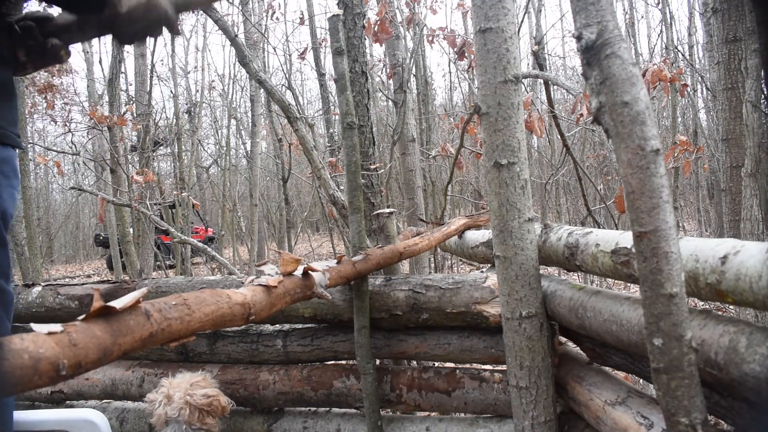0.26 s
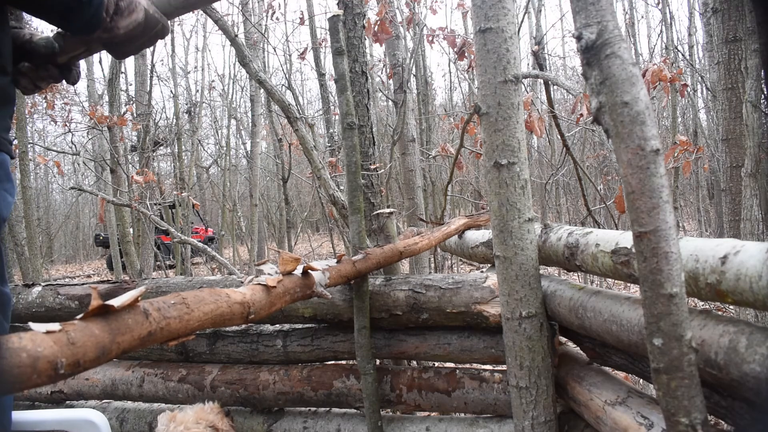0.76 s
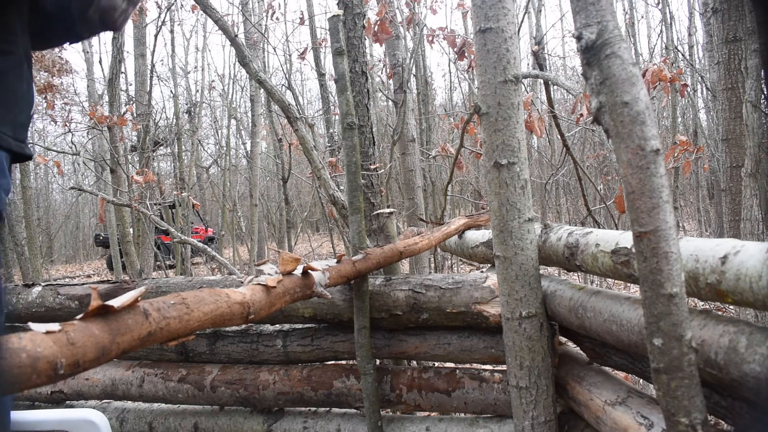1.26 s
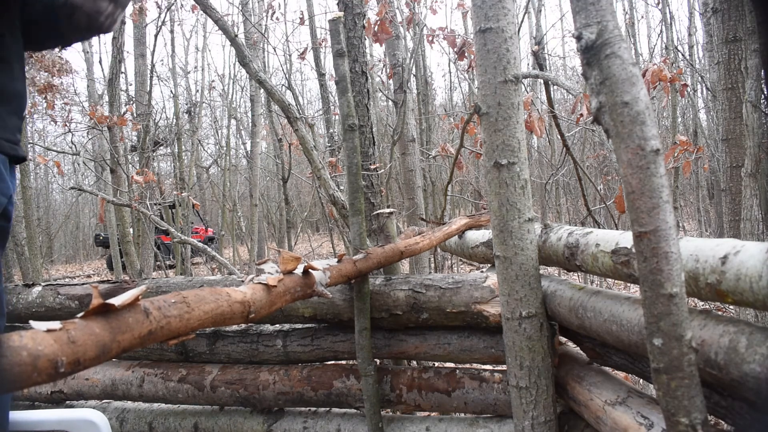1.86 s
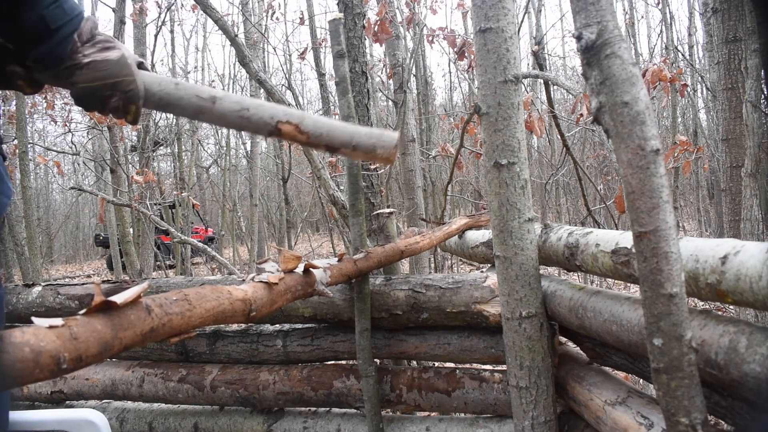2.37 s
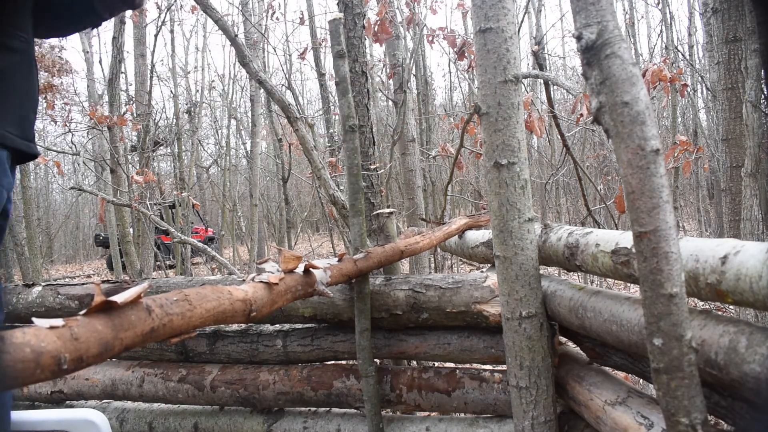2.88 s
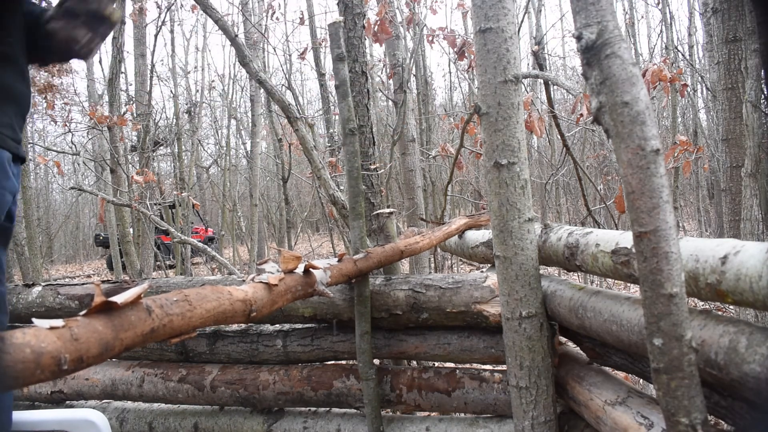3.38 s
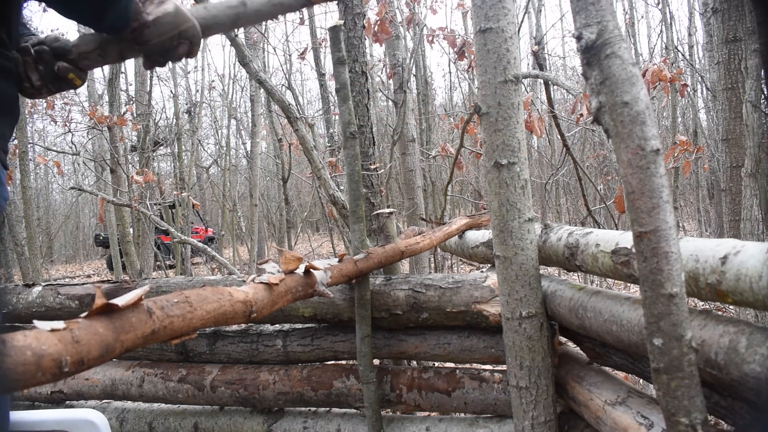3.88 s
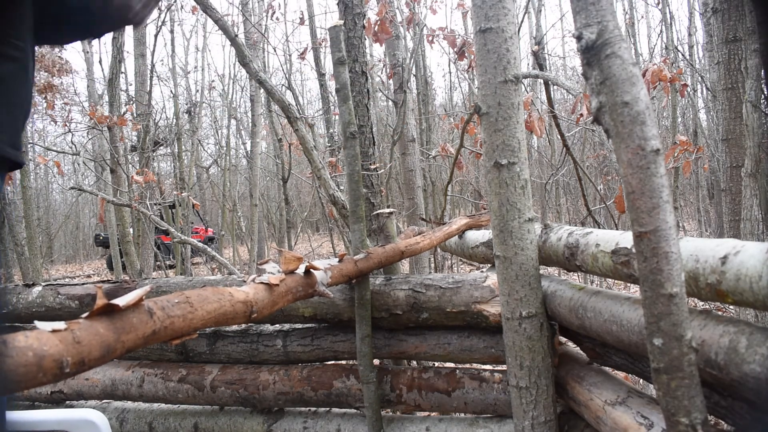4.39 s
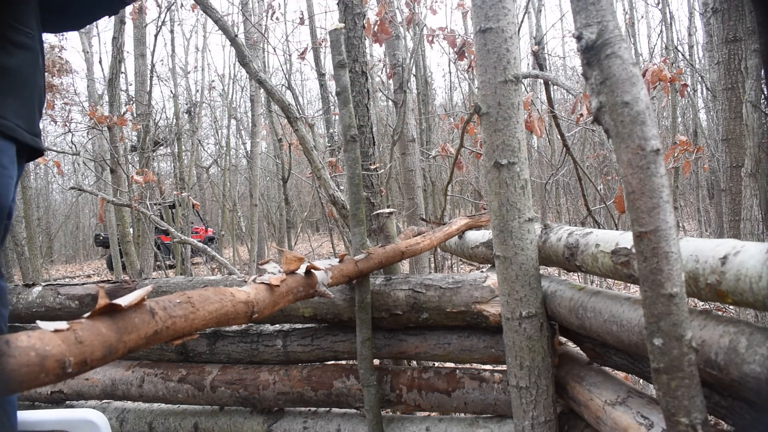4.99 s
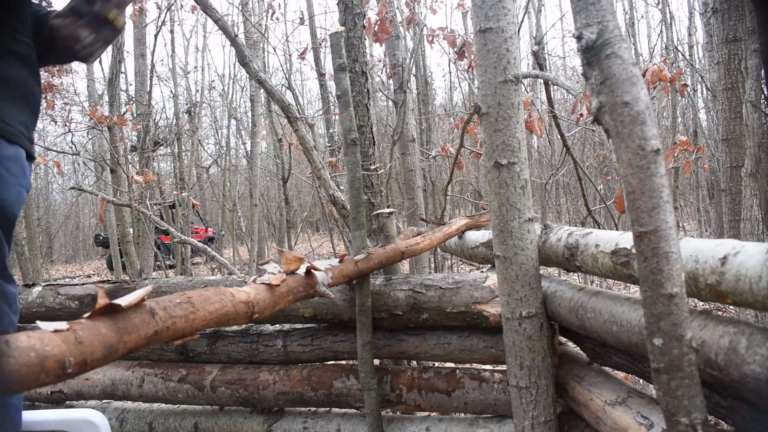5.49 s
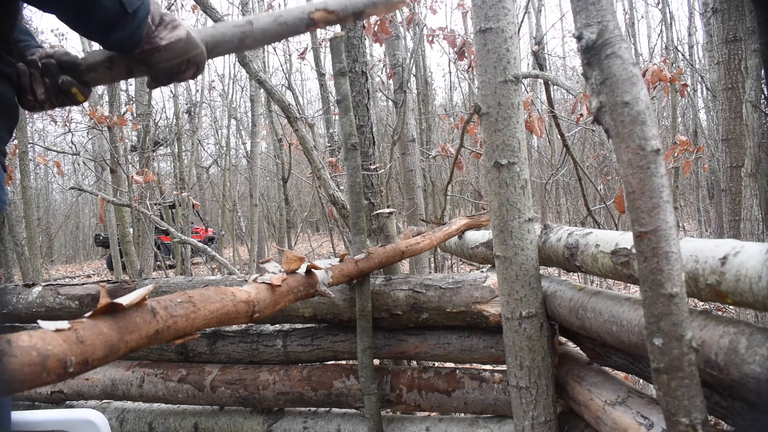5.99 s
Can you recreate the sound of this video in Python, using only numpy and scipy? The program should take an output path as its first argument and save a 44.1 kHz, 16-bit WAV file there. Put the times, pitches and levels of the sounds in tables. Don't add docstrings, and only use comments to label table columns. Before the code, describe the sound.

Outdoors in a bare wood, close to a small microphone, with quiet still air and a far low rumble. Cloth and dragged bark rustle at the start, then at 0.3 s a pole hits logs with a softer, heavy thud. Twigs snap around 0.45-0.55 s and in a thick cluster at 1.1-1.3 s, with faint high tinkles from a dog's metal tag until about 1.6 s. Full blows land at 1.4, 2.2 (hard, dry, with a quick double hit), 3.1, 3.8, 4.5 (hardest), 5.2 and 5.9 s. Each is a woody knock and bark crack over a deep, briefly ringing trunk; the input clips roughly and nearby trees scatter a short tail. Between them sleeves rustle, grit ticks, and logs creak faintly near 2.7, 4.0 and 4.8 s. Crisp leaf footfalls come at 4.9 and 5.6 s. The last blow's low ring fades.

```python
import sys
import numpy as np
from scipy import signal
from scipy.fft import rfft, irfft
from scipy.io import wavfile
from scipy.ndimage import uniform_filter1d

SR = 44100
rng = np.random.default_rng(int(sys.argv[2]) if len(sys.argv) > 2 else 0)


def convert_level_to_amplitude(level_db):
    exponent = np.asarray(level_db, float) / 20
    return 10 ** exponent


def unload_audio(sound):
    columns = np.transpose(np.atleast_2d(sound))
    steps = np.round(np.clip(columns, -1, 1) * 32767)
    wavfile.write(sys.argv[1], SR, steps.astype(np.int16))


N = 275625

# trunk ring in dB, thud in dB, crack in dB.
BLOWS = [
    (0.309, -14, -1, -0.5, -11),
    (1.407, -2, -6.5, -2.5, -8.5),
    (2.204, 0, -10.5, -17.5, -14.5),
    (3.057, -1, -7.5, -6.5, -13),
    (3.777, -2, -4.5, -7, -7),
    (4.5023, 0.5, -7.5, -12.5, -12.5),
    (5.216, -2, -5, -3.5, -8),
    (5.9294, -1.5, -4.5, -4, -4),
]


def level(x, db):
    return x * convert_level_to_amplitude(db) / np.sqrt(np.mean(x ** 2))


def colour(x, spectrum):
    hz, db = np.transpose(spectrum)
    f = np.maximum(np.arange(len(x) // 2 + 1) * SR / len(x), 1)
    return irfft(rfft(x) * convert_level_to_amplitude(np.interp(np.log(f), np.log(hz), db)), len(x))


def band(x, lo_hz, hi_hz, order=2):
    edges = [lo_hz, min(hi_hz, .45 * SR)]
    return signal.sosfilt(signal.butter(order, edges, "band", fs=SR, output="sos"), x)


def fade(t, t60):
    return np.exp(-np.log(1000) * t / np.maximum(t60, 1e-3))


def walk(rate):
    k = int(SR / rate)
    return uniform_filter1d(np.repeat(rng.standard_normal(N // k + 1), k), k)[:N]


def add(out, s, x):
    i = int(round(s * SR))
    out[i:i + len(x)] += x[:len(out) - i]


def outdoors():
    # frequency in Hz, density in dB per Hz.
    air_colour = [(100, -29.5), (170, -8), (371, -10), (423, -9), (996, -16), (1250, -22), (1760, -25),
                  (1940, -22), (4740, -29), (16000, -32)]
    # frequency in Hz, density in dB per Hz.
    rumble_colour = [(12, -50), (20, -20), (27, -15), (42, 0), (59, 0), (70, -1), (81, -12), (102, -19),
                     (119, -4), (140, -3), (153, -8), (162, -22), (200, -20), (260, -50), (440, -120)]
    air = level(colour(rng.standard_normal(N), air_colour), -61) * convert_level_to_amplitude(1.4 * walk(4.7))
    rumble = level(colour(rng.standard_normal(N), rumble_colour), -52.5) * convert_level_to_amplitude(0.71 * walk(2.3))
    return air + rumble


def grains(rate):
    hits = rng.random(N) < rate / SR
    boost_db = 4.0 * np.minimum(rng.exponential(size=N), 3)
    return level(hits * rng.standard_normal(N) * convert_level_to_amplitude(boost_db), 0)


def swell(s, rise_s, hold_s, fall_s, db):
    t = np.arange(N) / SR
    rise_db = 10 * np.maximum(s - t, 0) / max(rise_s, 1e-3)
    fall_db = 10 * np.maximum(t - s - hold_s, 0) / max(fall_s, 1e-3)
    return convert_level_to_amplitude(2 * (db - rise_db - fall_db))


def leaf_litter():
    # frequency in Hz, density in dB per Hz.
    rustle_colour = [(150, -38), (250, -6), (566, -0.5), (629, 1.5), (788, -3.5), (1330, -4.5),
                     (1880, -5.5), (2620, -4), (3840, -6), (4650, -5), (5630, -11.5), (7570, -12.5),
                     (10400, -18), (15200, -29.5), (16000, -33.5)]
    bits = sum(band(grains(250), hz / 1.12, hz * 1.12) for hz in 600 * 1.25 ** np.arange(15))
    crushed = level(bits, -2) + level(grains(900), -10) + rng.standard_normal(N)
    return colour(crushed, rustle_colour) * convert_level_to_amplitude(1.5 * walk(90))


def rustle():
    # peak in seconds, rise in seconds per 10 dB,
    # fall in seconds per 10 dB, level in dB.
    sleeve_rows = [(.02, 11, 0.08, -49.5), (.61, .15, 1.2, -65.5), (1.489, 0.08, .04, -41),
                   (1.64, 0.41, 0.5, -52), (1.724, -0.06, 1.05, -56.5), (1.9, 0.05, 0.23, -47.5),
                   (2.166, 0.04, 0.05, -42), (2.414, 0.11, 0.13, -47.5), (2.48, 0.16, 0.13, -53),
                   (2.675, 0.01, 0.18, -48), (2.871, 0.18, 0.09, -49.5), (2.999, 0.26, 0.08, -46.5),
                   (3.285, -0.1, -0.6, -62.5), (3.345, 0.0858, 0.0658, -38.5), (3.51, .06, -0.06, -46.5),
                   (3.699, 0.15, 0.1428, -37), (3.941, -0.1, 0.24, -46.5), (4.1, -0.37, 0.03, -45),
                   (4.43, 0.1, 0.14, -53.5), (5.331, 0.2, 0.15, -49), (5.52, -0.06, 0.77, -54),
                   (6.039, -0.52, 0.03, -50), (6.199, -0.4, -0.3, -54)]
    # peak in seconds, rise in seconds per 10 dB,
    # fall in seconds per 10 dB, level in dB.
    drag_rows = [
        (0.082, 0.3, .05, -47.5),
        (4.085, 0.07, -0.1, -46),
        (4.79, 0.17, 0.2, -57),
    ]
    # start in seconds, hold in seconds,
    # fall in seconds per 10 dB, level in dB.
    step_rows = [
        (1.11, 0.068, 0.02, -50),
        (1.341, 0.21, -0.04, -53),
        (4.922, .005, -0.16, -39),
        (4.937, 0.059, 0.01, -43.5),
        (5.023, .05, 0, -44.5),
        (5.594, 0.11, 0.02, -38.5),
        (5.727, 0.033, 0.03, -45.5),
        (5.799, 0.013, 0.08, -48.5),
    ]
    sleeves = sum(swell(s, rise, 0, fall, db) for s, rise, fall, db in sleeve_rows)
    drag = sum(swell(s, rise, 0, fall, db) for s, rise, fall, db in drag_rows)
    steps = sum(swell(s, 0.0037, hold, fall, db) for s, hold, fall, db in step_rows)
    settling = sum(swell(s, 0, 0, 0.11, db - 46) for s, db, *_ in BLOWS)
    stirring = convert_level_to_amplitude(2 * -71)
    # power, then low and top bands in dB relative to the middle.
    movers = [(sleeves, -8.5, -8.5), (steps, -10, -5.5), (settling, 8, -14),
              (drag, -4, -28), (stirring, 5.5, -2.5)]
    low_gain = np.sqrt(sum(power * convert_level_to_amplitude(2 * low_db) for power, low_db, _ in movers))
    mid_gain = np.sqrt(sum(power for power, _, _ in movers))
    top_gain = np.sqrt(sum(power * convert_level_to_amplitude(2 * top_db) for power, _, top_db in movers))

    litter = leaf_litter()
    low = level(band(litter, 250, 1200, order=3), 0) * convert_level_to_amplitude(1.5 * walk(40))
    mid = level(band(litter, 1200, 5400, order=4), 0) * convert_level_to_amplitude(1.2 * walk(60))
    top = level(band(litter, 6600, 16000, order=4), 0) * convert_level_to_amplitude(1.2 * walk(60))
    crisp = np.sqrt(steps) * level(band(litter[::-1], 3900, 5400, order=3), -5.5)
    bark = np.sqrt(drag) * level(band(litter[::-1], 800, 2300), 3.5)
    return convert_level_to_amplitude(-2.5) * (crisp + low_gain * low + mid_gain * mid + top_gain * top + bark)


def snaps():
    # start in seconds, peak in dB, centre in Hz, edge in dB relative to the body.
    twig_rows = [(0.0287, -38, 2070, -17), (.2044, -57, 1330, -20), (.408, -38, 2330, -25),
                 (0.4452, -24, 1230, -15), (.5107, -40, 2550, -14), (0.5302, -18.5, 1930, -35),
                 (.546, -25.5, 1750, -34), (.555, -34, 2050, -18), (.5846, -39, 2110, -17),
                 (.845, -39, 1260, -2), (1.1007, -29, 1230, -3), (1.1104, -35.5, 2210, 4),
                 (1.1294, -40, 2090, -11), (1.2095, -25, 1570, -7), (1.2166, -18, 1460, -17),
                 (1.2306, -16, 1930, -12), (1.2455, -21.5, 1210, -8), (1.2666, -24, 2380, -15.5),
                 (1.383, -34, 1190, 5), (1.6192, -37, 2830, 10), (2.4124, -46.5, 1720, -15),
                 (2.809, -38.5, 2970, -3.5), (3.3019, -26.5, 3270, -20), (3.7224, -22, 1330, -2.5),
                 (5.315, -35.5, 2420, -19.5), (5.7166, -31.5, 1530, -6.5), (5.803, -31, 1360, -10),
                 (5.9927, -28.5, 1250, 3), (6.0574, -48, 1213, -12)]
    # start in seconds, peak in dB, centre in Hz.
    grit_rows = [(0.1393, -34.5, 5970), (0.1498, -32, 5800), (.165, -37.5, 6800), (0.19, -41, 6770),
                 (.232, -35.5, 6800), (1.156, -29.5, 5100), (1.175, -28.5, 6500), (1.29, -42, 3970),
                 (1.328, -46.5, 4750), (1.3442, -36, 4140), (1.3543, -45.5, 7670), (1.72, -30, 3620),
                 (2.089, -36.5, 4000), (2.161, -33.5, 4000), (2.8427, -31.5, 4100), (2.8692, -22.5, 3920),
                 (3.0116, -41.5, 4100), (4.2722, -41.5, 4500), (4.4182, -43.5, 3530), (4.921, -28.5, 4380),
                 (4.942, -26, 3530), (5.0694, -41.5, 7020), (5.1557, -46.5, 4660), (5.5972, -20.5, 4230),
                 (5.675, -23, 4530), (5.7814, -48.5, 4800), (5.8195, -27.5, 5050), (5.8472, -33.5, 4150)]
    twigs = [(*row, 0.025 * 2 ** ((row[1] + 40) / 30.5)) for row in twig_rows]
    grit = [(*row, -12.5, 0.025) for row in grit_rows]
    out, t = np.zeros(N), np.arange(SR // 10) / SR
    width = 1.4
    for s, db, hz, edge_db, t60 in twigs + grit:
        noise = rng.standard_normal((3, len(t)))
        body = level(band(noise[0], hz / width, hz * width), 0)
        crisp = level(band(noise[1], 3500, 4200), edge_db)
        bright = level(band(noise[2], 6300, 12500), edge_db - 7)
        snap = body * fade(t, t60) + (crisp + bright) * fade(t, 0.52 * t60)
        add(out, s, convert_level_to_amplitude(db - 8.5) * snap)
    return out


def contact(first_s, chatter_s, chatter):
    t = np.arange(SR // 40) / SR
    push = np.exp(-((t - 2 * first_s) / first_s) ** 2) / (first_s * SR)
    rough = rng.standard_normal(len(t)) * t / chatter_s * np.exp(-t / chatter_s)
    return push + chatter * rough


def ring(modes, push, spread, grip_t60, free_db, scatter_db=2.5, count=4):
    hz, db, t60 = np.repeat(modes, count, axis=0).T[:, :, None]
    chance = rng.standard_normal((2, len(hz), 1))
    t = np.arange(SR // 4) / SR
    tones = np.sin(2 * np.pi * hz * (1 + spread * chance[1]) * t)
    body = (convert_level_to_amplitude(db + scatter_db * chance[0]) * fade(t, t60) * tones).sum(0)
    gripped = body * (fade(t, grip_t60) + convert_level_to_amplitude(free_db))
    y = signal.fftconvolve(gripped, push)[:len(t)]
    return y / np.abs(y).max()


def sway(modes, rise_s):
    t = np.arange(int(1.2 * SR)) / SR
    hz, db, t60, lag_ms = np.transpose(modes)[:, :, None]
    tones = np.cos(2 * np.pi * hz * (t - lag_ms / 1000))
    return (convert_level_to_amplitude(db) * fade(t, t60) * tones).sum(0) * (1 - np.exp(-(t / rise_s) ** 2))


def trunk_ring():
    # frequency in Hz, level in dB, t60 in seconds, arrival lag in ms.
    trunks = [(58.5, -4.4, .5, .2), (70.4, -14, 1.1, 4.0), (84.4, -12, .45, .6), (91.8, 0, .37, .9),
              (48, -20, .3, 2.4)]
    # frequency in Hz, level in dB, t60 in seconds, arrival lag in ms.
    cross_logs = [(124, -9.5, .09, -1.24), (134.2, -3.5, 0.12, -3), (148, -22.5, 0.012, 5.5),
                  (184.6, -10, 0.089, -2.4), (247, -8.5, 0.083, -1.58), (32.4, -22, 0.8, 3.3)]
    return sway(trunks, 0.013) + sway(cross_logs, 0.00022)


def log_thud():
    # frequency in Hz, level in dB, t60 in seconds.
    log_modes = [(197, -3, 0.035), (247, 0, 0.084), (381.2, -2.5, 0.33), (438.4, 2, 0.15), (486, 1.5, .13),
                 (572, -6.5, 0.13)]
    return ring(log_modes, contact(0.00037, 0.0054, 0.29), 0.013, 0.1, -12.5)


def pole_knock():
    # frequency in Hz, level in dB, t60 in seconds.
    pole_modes = [(667, -1.5, 0.16), (787, -11.5, 0.13), (800, -3.5, 0.13), (895, -8, 0.048),
                  (961, 5, 0.035), (1080, 4, 0.039), (1250, 0, 0.005), (1446, -4, 0.086),
                  (1853, -15, 0.017)]
    return ring(pole_modes, contact(0.00023, 0.0022, 0.27), 0.019, 0.026, -17.5)


def burst(noise, rise_s, t60, tail_db, tail_t60):
    t = np.arange(len(noise)) / SR
    drop = fade(np.maximum(t - rise_s, 0), t60)
    trail = convert_level_to_amplitude(tail_db) * fade(t, tail_t60)
    return level(noise, 0) * np.minimum(t / rise_s, 1) ** 2 * (drop + trail)


def blows():
    # trunk ring in dB, thud in dB, crack in dB.
    bounces = [
        (0.318, -39.5, -43, -7, -28),
        (2.2149, -23, -24, 15, -20),
        (2.2237, -7.5, -16, -37, -13.5),
        (3.783, -16.5, -12, -0.5, -7.5),
        (5.935, -9, -29, -8.5, -46),
        (0.447, -47, -24, 4, 7),
        (0.532, -39.5, -24.5, -22, 5),
        (1.218, -42, -24.5, 4.5, 3),
        (1.232, -38, -17.5, -2, -10),
        (5.2257, -15.5, -23.5, 3.5, -15.5),
    ]
    # frequency in Hz, density in dB per Hz.
    crack_colour = [(1000, -24.5), (1500, -21), (2100, 3.5), (2500, -9), (3500, 3), (4400, -4.5),
                    (5300, -24), (6500, -27)]
    # frequency in Hz, density in dB per Hz.
    splinter_colour = [(3500, -18.5), (5000, -7.5), (7300, 2.5), (10000, -2), (13000, -16.5), (16000, -24)]
    graze_s = 0.0025
    sharp, low = np.zeros(N), np.zeros(N)
    trunk = trunk_ring()
    for s, knock_db, trunk_db, thud_db, crack_db in [*BLOWS, *bounces]:
        noise = rng.standard_normal((3, SR // 8))
        add(low, s, convert_level_to_amplitude(knock_db + trunk_db + 2) * trunk)
        add(sharp, s, convert_level_to_amplitude(knock_db + thud_db + 2) * log_thud())
        add(sharp, s, convert_level_to_amplitude(knock_db + 8) * pole_knock())
        graze = burst(band(noise[2], 500, 6800), graze_s, 0.016, -40, 0.03)
        add(sharp, s - graze_s, convert_level_to_amplitude(knock_db - 25) * graze)
        crack = burst(colour(noise[0], crack_colour), 0.0024, 0.013, -23, 0.02)
        add(sharp, s, convert_level_to_amplitude(knock_db + crack_db + 2) * crack)
        splinter = burst(colour(noise[1], splinter_colour), 0.0034, 0.0059, -21.5, 0.21)
        add(sharp, s, convert_level_to_amplitude(knock_db + max(trunk_db, -10.5) - 12) * splinter)
    return sharp, low


def wood(x):
    # band centre in Hz, level in dB, t60 in seconds.
    scatter = [(258.4, -58, 0.17), (463, -54, 0.19), (926, -55, 0.18), (1900, -37.5, 0.1),
               (4300, -30, 0.11), (8000, -30.5, 0.17), (13000, -25.5, 0.099)]
    t = np.arange(SR // 2) / SR
    tail = np.zeros(len(t))
    for hz, db, t60 in scatter:
        octave = level(band(rng.standard_normal(len(t)), hz / np.sqrt(2), hz * np.sqrt(2)), 0)
        tail += convert_level_to_amplitude(db) * fade(t, t60) * octave / np.sqrt(hz / 8000)
    return signal.fftconvolve(x, convert_level_to_amplitude(-16.5) * tail * np.minimum(t / 0.008, 1))[:N]


def tag():
    # start in seconds, then the level in dB of each of the four modes.
    taps = [
        (0.4094, -72, -73, -69, -80),
        (0.5447, -54, -73, -67, -75),
        (1.2494, -65, -64.5, -54, -75),
        (1.2744, -65, -55, -64, -77),
        (1.3544, -55.5, -59.5, -56, -67.5),
        (1.5544, -60, -69, -45.5, -73),
        (1.565, -54, -73, -65, -74),
    ]
    # frequency in Hz, t60 in seconds.
    disc_modes = [(7690, 0.089), (10780, .16), (11060, 0.06), (12930, 0.1)]
    out, t = np.zeros(N), np.arange(SR // 5) / SR
    for s, *dbs in taps:
        for db, (hz, t60) in zip(dbs, disc_modes):
            add(out, s, convert_level_to_amplitude(db + 0.5) * fade(t, t60) * np.sin(2 * np.pi * hz * t))
    return out


def creaks():
    # middle in seconds, length in seconds, frequency in Hz, level in dB.
    rubs = [
        (2.693, 0.034, 1110, -52.5),
        (3.982, 0.18, 1440, -57),
        (3.983, 0.08, 2440, -50),
        (4.087, 0.018, 865, -43.5),
        (4.79, .06, 1520, -59),
        (4.804, 0.054, 2420, -55.5),
        (4.843, 0.057, 890, -56),
    ]
    width = 1.06
    out, t = np.zeros(N), np.arange(N) / SR
    for s, length, hz, db in rubs:
        tone = level(band(rng.standard_normal(N), hz / width, hz * width), db)
        out += tone * np.exp(-(2 * (t - s) / length) ** 2)
    return out


def scene():
    sharp, low = blows()
    twigs = snaps()
    echoes = wood(sharp + 0.5 * twigs)
    return (outdoors() + rustle() + twigs + sharp + low + echoes + tag() + creaks())[None]


def roll_off(x):
    return signal.sosfilt(signal.butter(12, 16480, fs=SR, output="sos"), x)


def record(dry):
    low_pass = signal.ellip(8, 0.2, 60, 16000, fs=SR, output="sos")
    hot = signal.sosfilt(low_pass, np.clip(dry, -1, 1))
    return roll_off(np.clip(hot, -1, 1))


dry = scene()
out = record(dry)
unload_audio(out)
```